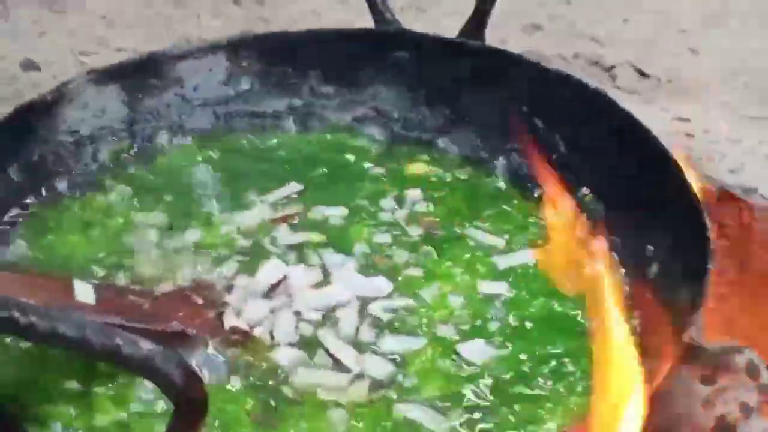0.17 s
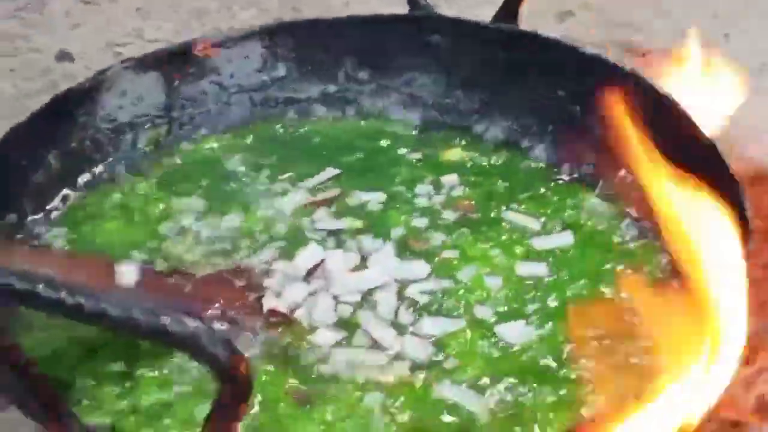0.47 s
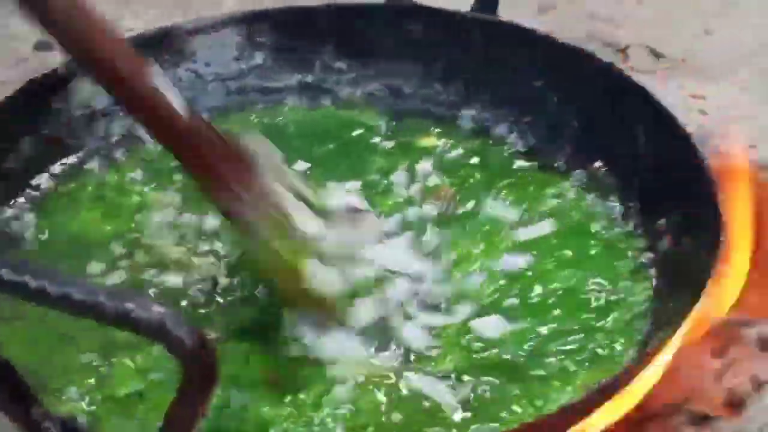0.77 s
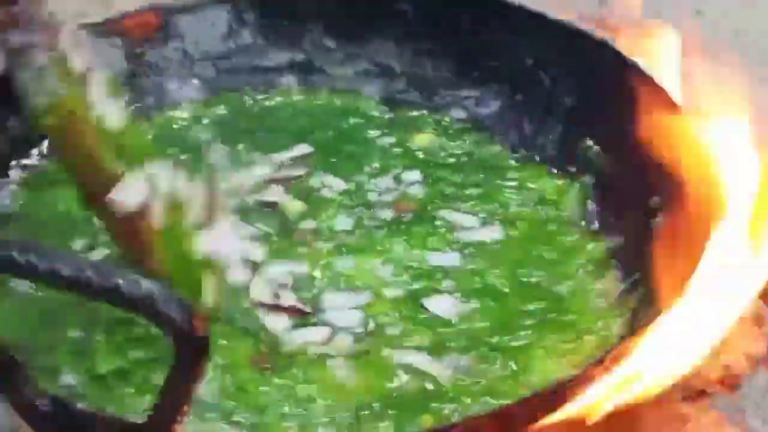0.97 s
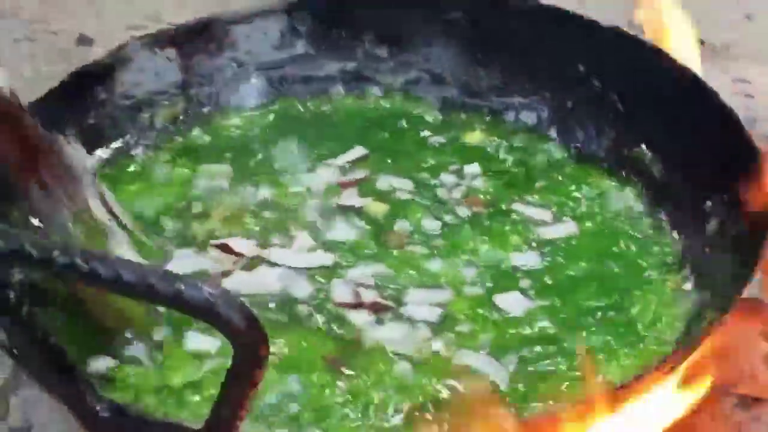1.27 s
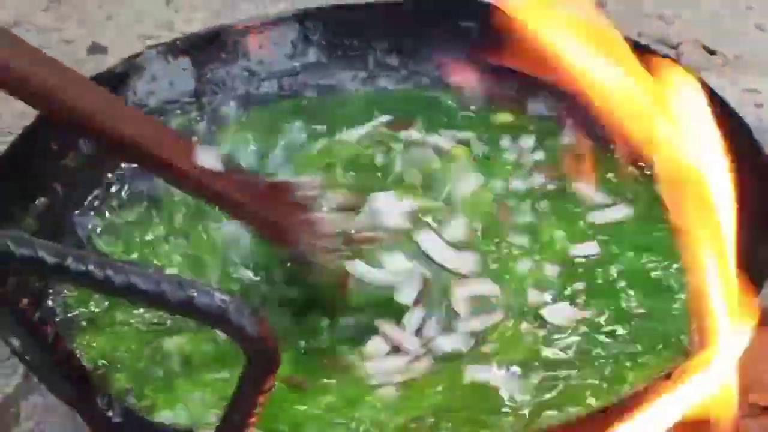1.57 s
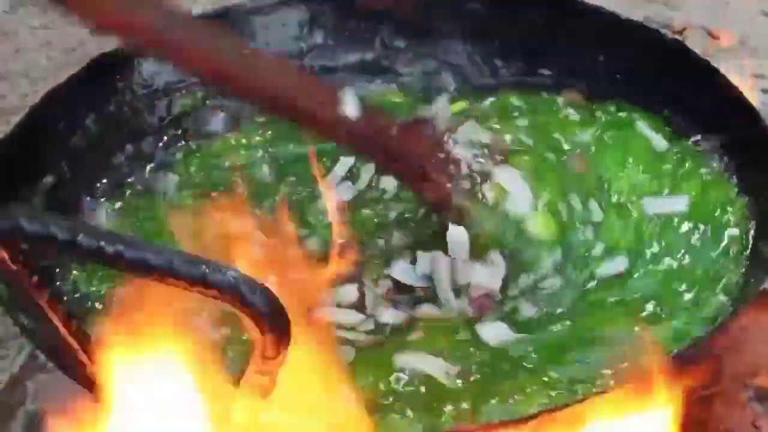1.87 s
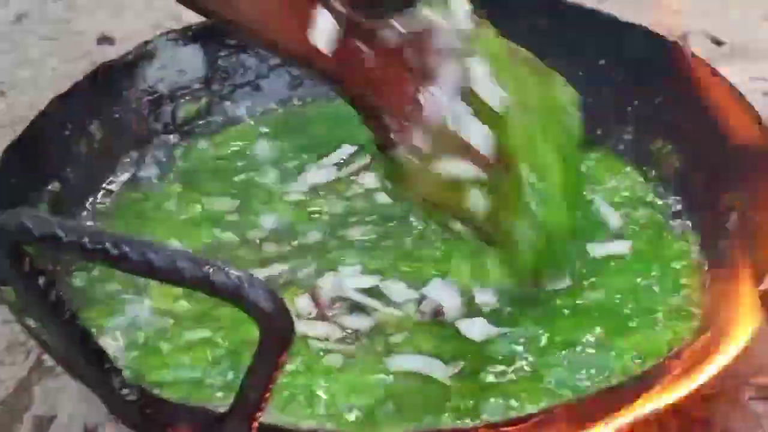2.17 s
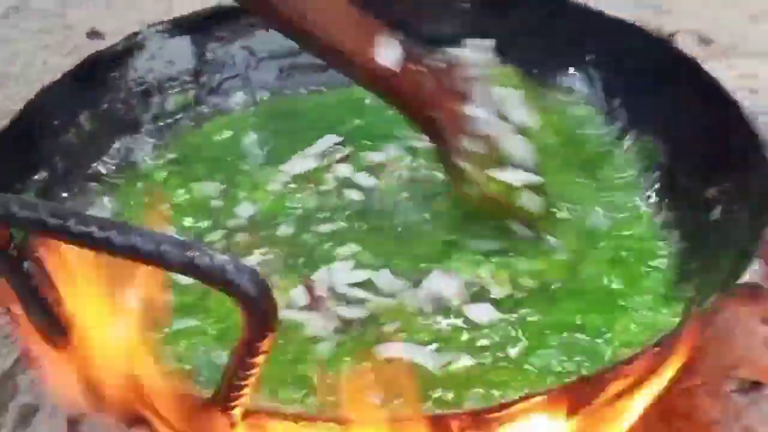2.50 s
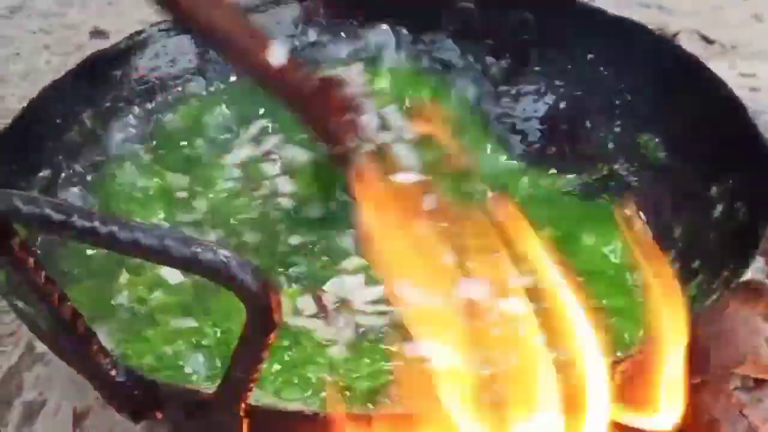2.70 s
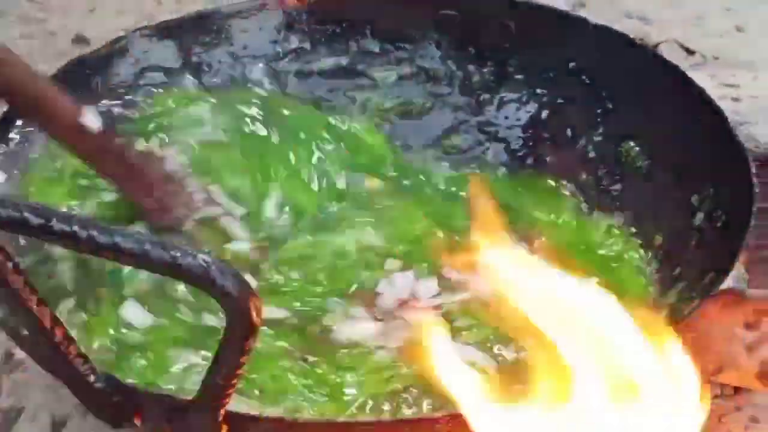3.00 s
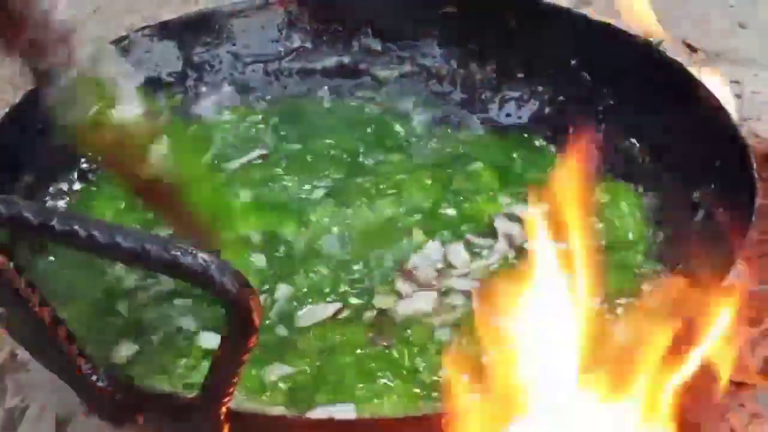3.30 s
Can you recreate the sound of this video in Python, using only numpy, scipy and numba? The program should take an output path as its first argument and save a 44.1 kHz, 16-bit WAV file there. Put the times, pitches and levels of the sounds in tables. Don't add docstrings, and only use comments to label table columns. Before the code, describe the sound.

Thick green paste boils and pops in hot oil over a fluttering wood fire outdoors

```python
import sys
import numpy as np
from scipy import signal
from scipy.fft import rfft, irfft
from scipy.io import wavfile
from scipy.ndimage import uniform_filter1d
from numba import njit

SR = 44100
rng = np.random.default_rng(int(sys.argv[2]) if len(sys.argv) > 2 else 0)


def transcribe(u):
    v = np.clip(np.atleast_2d(u).T, -1, 1)
    q = np.round(v * 32767).astype(np.int16)
    wavfile.write(sys.argv[1], SR, q)


def linear_from_db(decibels):
    return 10 ** (np.asarray(decibels, float) / 20)


N = 152145


def curve(table, t):
    return np.interp(t, *np.array(table, float).T)


def colour(table, hz):
    f, db = np.array(table, float).T
    return np.interp(np.log(np.maximum(hz, 1)), np.log(f), db)


def unit(x):
    return x / np.sqrt(np.mean(x ** 2))


def shaped(x, gain):
    return irfft(rfft(x) * gain(np.fft.rfftfreq(N, 1 / SR)), N)


def noise_band(gain):
    return unit(shaped(rng.standard_normal(N), gain))


def walk(rate):
    hold = int(SR / rate)
    steps = np.repeat(rng.standard_normal(N // hold + 1), hold)
    return unit(uniform_filter1d(uniform_filter1d(steps, hold), hold)[:N])


def smear(x, tail):
    return signal.fftconvolve(x, tail / np.linalg.norm(tail))[:N]


@njit
def grains(n, start, hz, cycles, size, glide, fall):
    out = np.zeros(n)
    for k in range(len(start)):
        span, phase = cycles[k] * SR / hz[k], 0.
        for j in range(min(int(span * (1 + 5 * fall)), n - start[k])):
            u = j / span
            pitch = hz[k] * (1 + glide[k] * (min(u, 1.5) - .7))
            phase += 2 * np.pi * min(pitch, .45 * SR) / SR
            swell = u ** .3 if u < 1 else np.exp((1 - u) / fall)
            out[start[k] + j] += size[k] * np.sin(phase) * swell
    return out


def listed(s, db, hz, cycles, glide, fall):
    start = (s * SR).astype(np.int64)
    size = linear_from_db(db - colour(MIC, hz))
    return grains(N, start, hz, np.clip(cycles, .5, 30), size, glide + 0 * s, fall)


# start t/s, glide t/s, from f/Hz, top f/Hz, level/dB
CHIRPS = [
    (2.10, .04, 4200, 6100, -36),
    (2.19, .045, 4400, 6500, -36),
    (2.28, .05, 4300, 6300, -37),
    (2.38, .04, 4300, 6150, -38),
    (2.485, .11, 4900, 6350, -35),
    (2.67, .1, 5000, 6520, -33),
    (2.88, .095, 5200, 6750, -36),
    (3.085, .105, 5500, 6850, -41),
    (3.255, .112, 3900, 6750, -33.5),
]
CHIRP_CLEAR = [0, 0, 0, .1, .2, .2, .1, .1, .7]


def bird(t):
    hold_s, buzz_depth, hold_db, tilt_db = .018, .025, 2, -16
    yard_t60_s, yard_db = .3, -5
    out, buzz, rasp = np.zeros(N), walk(400), walk(1000)
    for (s, glide, low_hz, top_hz, db), clear in zip(CHIRPS, CHIRP_CLEAR):
        u = np.clip((t - s) / glide, 0, 1)
        wobble = buzz_depth * (buzz + .5 * np.sin(np.pi * u ** 2)) * (u < 1)
        hz = (low_hz + (top_hz - low_hz) * u) * (1 + wobble)
        rise = np.clip((t - s) / .015, 0, 1)
        release = np.clip((s + glide + hold_s - t) / .012, 0, 1)
        held = hold_db * (u >= 1) * np.sign(glide - .07)
        level = db + tilt_db * u + held - colour(MIC, hz)
        voice = np.where(u < 1, clear + (1 - clear) * rasp, 1)
        out += linear_from_db(level) * rise * release * voice * np.sin(2 * np.pi * np.cumsum(hz) / SR)
    u = np.arange(SR // 2) / SR
    yard = rng.standard_normal(len(u)) * linear_from_db(-60 * u / yard_t60_s)
    return out + linear_from_db(yard_db) * smear(out, yard)


# t/s, level/dB
FLAME = [(0, -58), (.1, -50), (.27, -39), (.42, -44.5), (.6, -40.5), (.75, -44), (1.07, -41.5), (1.3, -49),
         (1.35, -40.5), (1.46, -58), (1.76, -40.5), (1.98, -52), (2.4, -48), (2.55, -49), (2.7, -51.5),
         (3.38, -53.5), (3.45, -53)]
# f/Hz, level/dB
FLAME_COLOUR = [(25, -37), (60, -17), (95, -0.5), (125, 2.5), (200, -1), (400, -12)]


def flames(t):
    flutter_hz, flutter_width_hz = 330, 150
    roar = noise_band(lambda f: linear_from_db(colour(FLAME_COLOUR, f)) / (1 + (f / 600) ** 2))
    flutter = noise_band(lambda f: np.exp(-((f - flutter_hz) / flutter_width_hz) ** 2))
    strength_db = curve(FLAME, t)
    roar_db = -42.5 + 2 * walk(8.92) + 0.31 * (strength_db + 45.5)
    flutter_db = strength_db + 3.3 * walk(24.87)
    return roar * linear_from_db(roar_db) + flutter * linear_from_db(flutter_db)


# start t/s, length t/s, level/dB
HISSES = [
    (1.505, 0.125, -21.5),
    (2, 0.097, -22),
    (0.45, 0.24, -41.5),
    (0.64, 0.12, -33),
    (1.5, 0.069, -26),
]


def hisses(t):
    out = 0
    for s, length, db in HISSES:
        swell = np.clip((t - s) / .015, 0, 1)
        fade = np.exp(-np.maximum(t - s - length / 2, 0) / .045)
        out = out + linear_from_db(db) * swell * fade
    return out


# t/s, level/dB
BOIL = [(0.0, -42), (0.27, -40.5), (0.71, -40), (1.33, -38.5), (1.49, -42), (1.72, -31.5), (1.93, -36),
        (2.46, -38), (2.94, -36.5), (3.28, -42.5), (3.45, -36.5)]


def steam(t):
    level = linear_from_db(-38 + 0.5 * (curve(BOIL, t) + 40)) + hisses(t)
    out = 0
    for hz in (7000, 9500, 13000):
        flicker = linear_from_db(2.5 * walk(10) + 2 * walk(300))
        noise = rng.standard_normal(N) * level * flicker
        out = out + shaped(noise, lambda f: np.exp(-(np.log2((f + 1) / hz) / .5) ** 2))
    return out


def scrape(t):
    scrape_hz, width_hz, scrape_db = 970, 200, -15
    rub = noise_band(lambda f: np.exp(-((f - scrape_hz) / width_hz) ** 2))
    return rub * hisses(t) * linear_from_db(scrape_db + 3.9 * walk(59.9))


# centre t/s, length t/s, level/dB
SURGES = [(0.042, 0.014, -53), (0.089, 0.0045, -36), (0.195, 0.017, -36), (0.316, 0.017, -40.5),
          (0.396, 0.02, -32), (0.472, 0.021, -37), (0.595, 0.0064, -32.5), (0.629, 0.0056, -40),
          (0.74, 0.022, -36), (0.822, 0.079, -35), (0.979, 0.039, -37), (1.091, 0.02, -33.5),
          (1.763, 0.05, -34), (1.198, 0.018, -35.5), (1.306, 0.017, -34.5), (1.362, 0.018, -37.5),
          (1.443, 0.022, -34.5), (1.524, 0.024, -31.5), (1.582, 0.11, -28.5), (1.864, 0.024, -33),
          (1.951, 0.0092, -32.5), (2.107, 0.017, -34), (2.244, 0.068, -38), (2.361, 0.0065, -35),
          (2.519, 0.048, -37), (2.608, 0.0072, -33.5), (2.687, 0.0068, -36), (2.858, 0.03, -36.5),
          (2.936, 0.16, -37), (3.073, 0.059, -38.5), (3.28, 0.032, -40.5)]


def boil(t):
    power = linear_from_db(2 * (curve(BOIL, t) - 2.5 + 2.24 * walk(22.59)))
    for s, length, db in SURGES:
        power = power + linear_from_db(2 * db) * np.exp(-(2 * (t - s) / length) ** 2)
    return np.sqrt(power)


def crackle(t, count=900):
    when, pitch, strength = rng.random((count, 3)).T
    size = linear_from_db(np.minimum(-4.5 * np.log(1 - strength), 13) + 0.5)
    start, hz = (when * N).astype(np.int64), 5500 * 2.8 ** pitch
    return grains(N, start, hz, 2 + 0 * hz, size, 0 * hz, 0.65) * boil(t)


def froth(t, count=24000):
    low_hz, top_hz, tilt_db = 407.4, 6704, 3
    when, pitch, strength, span, sign = rng.random((count, 5)).T
    hz = low_hz * (top_hz / low_hz) ** pitch
    strength_db = np.minimum(-4.0 * np.log(1 - strength), 11)
    size = linear_from_db(strength_db + tilt_db * np.log2(hz / 2000)) * np.sign(sign - span)
    cycles = (.6 + 9 * span ** 4) * np.clip(hz / 1500, .3, 1)
    bubbles = unit(grains(N, (when * N).astype(np.int64), hz, cycles, size, .04 + 0 * hz, 1.6))
    fizz = noise_band(lambda f: f / np.hypot(f, 400) / np.hypot(f, 6000))
    heard = np.std(microphone(bubbles))
    return (bubbles + linear_from_db(-6) * fizz) / heard * boil(t)


# t/s, peak level/dB
SPITS = [(0.042, -43), (0.0605, -50), (0.2317, -47), (0.2655, -60), (0.2982, -54), (0.325, -46.5),
         (0.374, -41.5), (0.488, -44), (0.6975, -42), (0.841, -38), (0.877, -41), (0.9702, -34),
         (1.1969, -31.5), (1.218, -46), (1.293, -45), (1.3093, -41.5), (1.3563, -43), (1.3713, -44),
         (1.7297, -44), (1.9385, -55), (1.9552, -41.5), (2.0023, -45.5), (2.2335, -47), (2.4648, -45),
         (2.5092, -48), (2.808, -50), (3.305, -54)]


def spits():
    out, u = np.zeros(N), np.arange(2048) / SR
    crack = np.minimum(u / .0025, 1) ** 2 * np.exp(-np.maximum(u - .0025, 0) / .0012) / 3
    shape = crack + linear_from_db(-24) * np.exp(-u / .008)
    for s, db in SPITS:
        start = int(s * SR)
        out[start:start + 2048] += linear_from_db(db + 42.5) * rng.standard_normal(2048) * shape
    return shaped(out, lambda f: f ** 2 / (f ** 2 + 5500 ** 2) / (1 + (f / 13000) ** 4))


# t/s, peak level/dB, f/Hz
PLOPS = [(0.253, -28.5, 164), (0.554, -28.5, 210), (0.821, -28, 232), (1.642, -16.5, 615),
         (1.714, -19, 836), (2.528, -24, 221), (0.372, -34, 380), (1.518, -28.5, 165), (1.861, -29.5, 530),
         (2.169, -24, 564), (2.71, -28, 296), (2.812, -32.5, 211)]


def plops():
    s, db, hz = np.array(PLOPS, float).T
    return listed(s, db - 1.5, hz, 1.3 + 0 * s, 0.37, 0.23)


# t/s, peak level/dB, f/Hz
SNAPS = [(1.1923, -18, 3000), (1.202, -18, 3500), (1.291, -14, 2500), (1.306, -21, 3540),
         (1.3098, -7, 2700), (1.6473, -14, 1490), (1.6562, -10, 2100), (1.8775, -5, 2480),
         (2.066, -25, 1210), (2.2349, -11, 3320), (2.8763, -17.5, 1040), (2.81, -25, 4000)]


def snaps():
    s, db, hz = np.array(SNAPS, float).T
    return listed(s, db, hz, .6 + 0 * s, 0., .5)


# t/s, peak level/dB, f/Hz
POPS = [(0.166, -25.5, 3280), (0.3576, -20, 3980), (0.5126, -29.5, 2670), (0.654, -28, 2340),
        (0.7642, -18, 3830), (0.869, -11, 3230), (0.8904, -16, 3880), (0.9723, -15, 5560),
        (1.1662, -17, 3730), (1.1958, -21, 4170), (1.3483, -37, 1900), (1.45, -20.5, 2740),
        (1.504, -23.5, 1610), (1.5508, -19, 1430), (1.648, -15, 2020), (1.6558, -18, 1590),
        (1.7516, -18, 2740), (1.8664, -10, 3540), (1.877, -10.5, 3100), (1.947, -16.5, 2760),
        (2.0984, -24, 2110), (2.1732, -20.5, 1760), (2.2348, -31, 1730), (2.4016, -19, 4370),
        (2.4599, -19, 3400), (2.5988, -26.5, 2320), (2.6851, -24.5, 2300), (2.782, -19, 3370),
        (2.8754, -22.5, 2310), (3.2326, -35, 1510),
        (0.0402, -28.5, 1570), (0.0817, -31, 3180), (0.0882, -29.5, 1610), (0.197, -26.5, 3730),
              (0.2289, -31, 4100), (0.2912, -30.5, 1940), (0.471, -26, 3500), (0.7287, -30, 2420),
              (1.2386, -26, 3350), (1.3724, -21, 4720), (1.41, -31.5, 3496), (1.8226, -25, 1710),
              (1.9973, -24.5, 1660), (2.0446, -22.5, 4180), (2.0673, -35, 1970), (2.2234, -27, 1640),
              (2.261, -33, 1700), (2.356, -27, 2140), (2.3813, -29, 1580), (2.6064, -24.5, 2360),
              (2.7938, -16, 3070), (2.9103, -24, 3720), (3.0518, -24.5, 2200), (3.0665, -23, 3480),
              (3.0976, -29, 3420), (3.1423, -28, 1780), (3.1647, -31, 1780), (3.244, -29, 1474),
              (3.3157, -26, 3360)]
# t/s, peak level/dB, f/Hz, swell/cycles
LONG_POPS = [(0.4928, -16.5, 3140, 5.9), (0.557, -27.5, 3350, 12), (0.9386, -24, 3400, 11),
             (1.063, -29.5, 3220, 6.8), (1.1885, -17, 1800, 2.6), (1.275, -22.5, 2550, 8.7),
             (1.3109, -3, 3950, 4.4), (1.3622, -26, 1880, 10), (1.5158, -24.5, 1600, 11),
             (1.5906, -25, 1786, 17), (1.6739, -21, 1604, 7), (1.852, -19, 2680, 16.4),
             (1.899, -21.5, 3500, 9.0), (2.277, -22.5, 1670, 8.1), (2.512, -17, 1660, 6.4),
             (3.126, -27, 3200, 9.5), (3.02, -33.5, 533, 8.1), (0.1658, -34, 6100, 9.8),
             (0.972, -37.5, 8800, 13.6), (0.2306, -37.5, 6000, 8)]


def pops():
    s, db, hz = np.array(POPS, float).T
    short = listed(s, db, hz, np.where(db > -20, 2.5, 3.5), .15, .6)
    return short + listed(*np.array(LONG_POPS, float).T, .1, .3)


def scene():
    pan_delay_s, pan_t60_s, pan_db = .003, .045, -9
    t = np.arange(N) / SR
    around = bird(t) + flames(t)
    seething = steam(t) + scrape(t) + crackle(t) + froth(t)
    near = spits() + plops() + snaps() + pops()
    u = t[:4096]
    ring = rng.standard_normal(4096) * linear_from_db(-60 * u / pan_t60_s) * (u > pan_delay_s)
    return (around + seething + near + linear_from_db(pan_db) * smear(near, ring))[None]


# f/Hz, level/dB
MIC = [(700, -2.5), (1200, -7), (1600, -2.5), (2100, -2.5), (4100, 1), (5300, -6.5), (7600, -34.5),
       (10500, -37)]


def microphone(x):
    port_hz, port_width_hz, port_db, top_hz = 12600., 1500., -32, 15740
    f = np.fft.rfftfreq(N, 1 / SR)
    port = linear_from_db(port_db) * np.exp(-((f - port_hz) / port_width_hz) ** 2)
    body = linear_from_db(colour(MIC, f) - 6.3 * np.clip(f / 10500 - 1, 0, 1))
    cepstrum = irfft(np.log(body + port), N)
    cepstrum[1:N // 2] *= 2
    cepstrum[N // 2:] = 0
    rumble_cut = 1 / (1 + (40 / (f + 1)) ** 4)
    return irfft(rfft(x) * np.exp(rfft(cepstrum)) * (f < top_hz) * rumble_cut, N)


def low_pass(x):
    return signal.sosfilt(signal.butter(12, 15890, fs=SR, output="sos"), x)


def record(dry):
    mix = microphone(dry[0])[None]
    return low_pass(mix)


dry = scene()
out = record(dry)
transcribe(out)
```